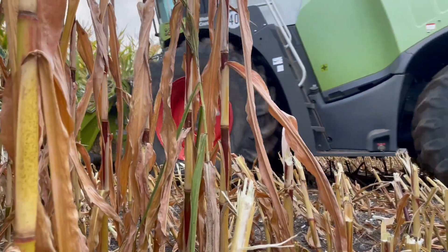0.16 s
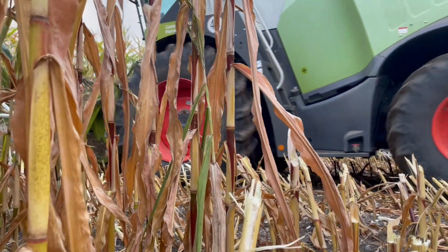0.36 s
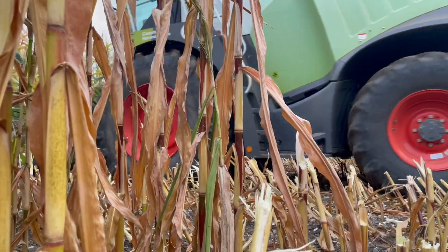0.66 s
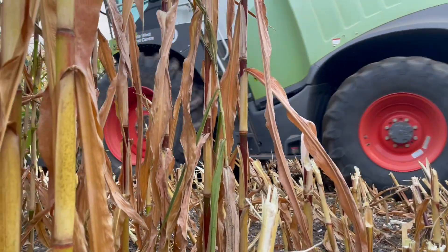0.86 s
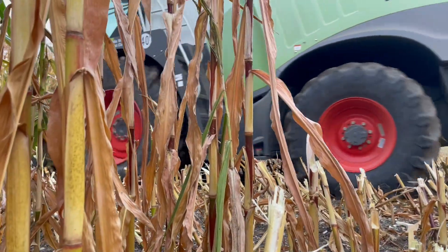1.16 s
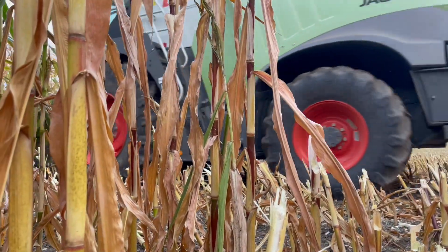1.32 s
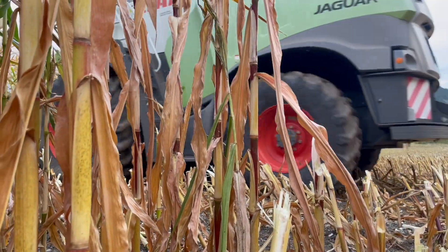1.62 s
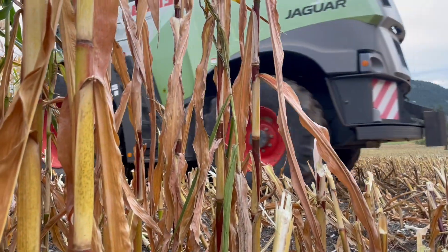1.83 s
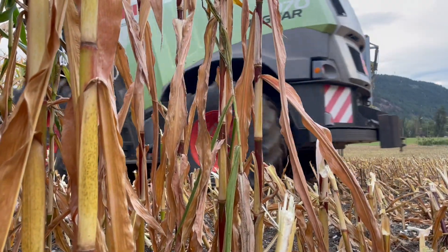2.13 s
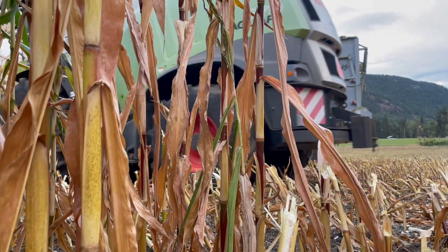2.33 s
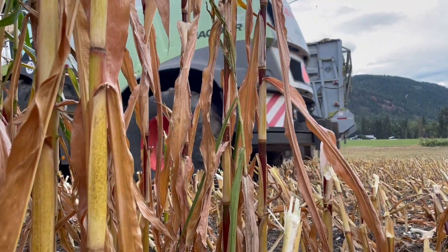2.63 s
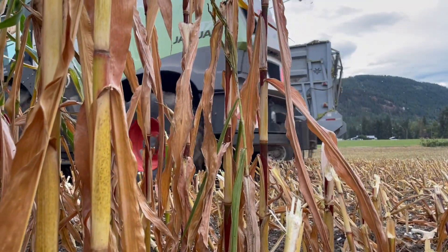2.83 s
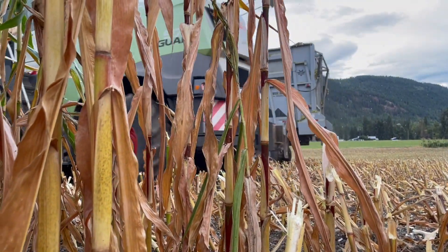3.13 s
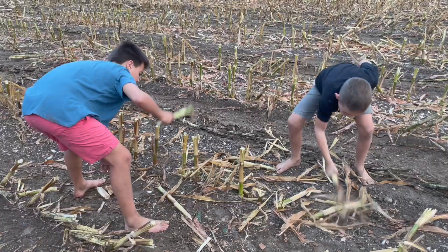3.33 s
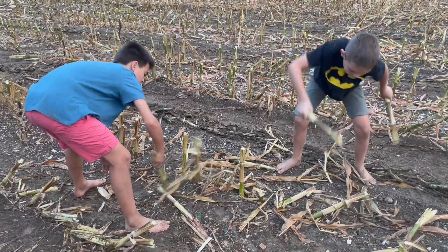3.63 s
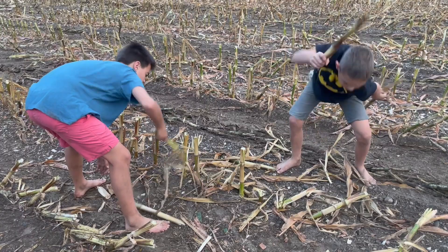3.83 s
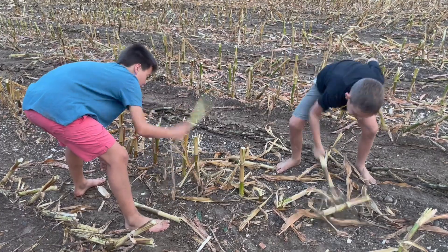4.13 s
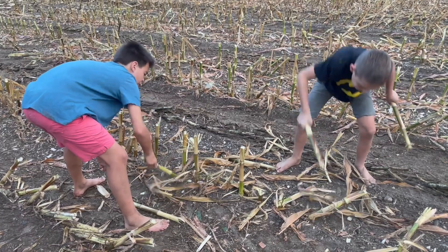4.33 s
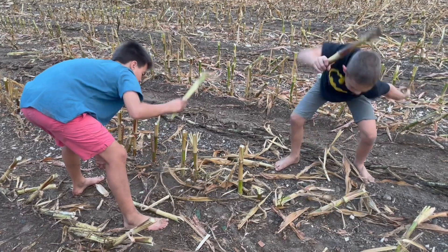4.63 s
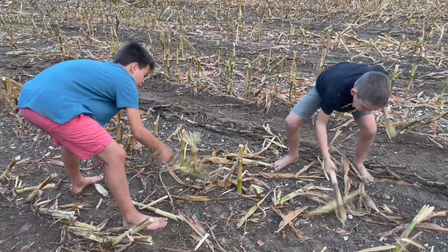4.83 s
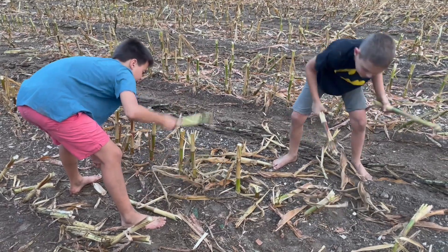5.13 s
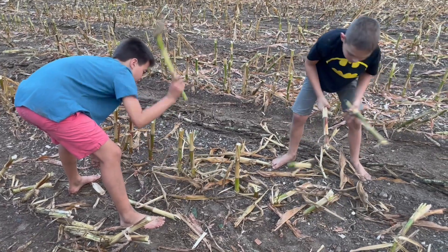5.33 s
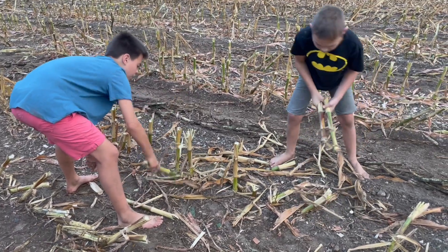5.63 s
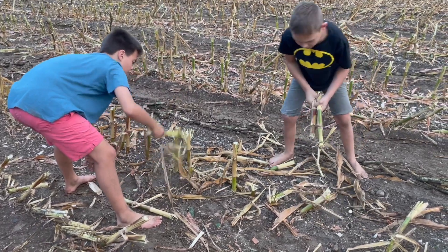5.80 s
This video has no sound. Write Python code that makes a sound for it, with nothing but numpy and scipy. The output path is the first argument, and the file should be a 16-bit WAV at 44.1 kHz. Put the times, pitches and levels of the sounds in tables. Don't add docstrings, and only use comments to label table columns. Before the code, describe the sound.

Close stereo handheld pickup, open air with no echo. First a dense, continuous machine roar with low booming panels and a tonal chopper drone, its hiss brightening near the end. A hard cut leads to near quiet: uneven sharp whacks of dry stalks on soil, strong full hits alternating with thinner lighter ones, splintering ticks, rustling leaves, low wind buffets, far engine hum and barely audible whistles.

```python
import sys
import numpy as np
from scipy import signal
from scipy.fft import rfft, irfft, next_fast_len
from scipy.io import wavfile

SR = 44100
rng = np.random.default_rng(int(sys.argv[2]) if len(sys.argv) > 2 else 0)


def boost_factor(decibels):
    exponent = np.asarray(decibels, float) / 20
    return 10 ** exponent


def generate_wav(sig):
    pcm = np.round(np.clip(np.atleast_2d(sig).T, -1, 1) * 32767).astype(np.int16)
    wavfile.write(sys.argv[1], SR, pcm)


N = 262836
T = np.arange(N) / SR
HARVEST_END_S, FIELD_START_S, FIELD_FADE_S = 3.2045, 3.24, .03
RUMBLE_DB = -15.5

# frequency in Hz, likeness from 0 to 1.
LIKENESS = [(60, 0.95), (150, 0.97), (300, 0.88), (640, 0.95), (1200, 0.65), (3000, 0.89), (6000, 0.61),
            (8500, 0.9), (11000, 0.87), (14000, 0.51)]
# frequency in Hz, density in dB per Hz.
FIELD_COLOUR = [(28, 7), (60, -1.5), (110, 8.5), (200, -23.5), (400, -11), (700, -18.5), (1200, -28),
                (2000, -26.5), (4000, -24.5), (7000, -28.5), (12000, -22.5), (16000, -32)]
# start in seconds, peak in dB, brightness in dB, hold in seconds, T60 in seconds.
SOIL_BLOWS = [(3.3301, -5, -3, 0.001, 0.023), (3.34, -19, 3, 0.009, 0.016), (3.361, -25, -6, 0.0043, .021),
              (3.367, -27, -1, 0.0094, 0.016), (4.0651, -8, -1.5, 0.004, 0.032),
              (4.087, -27, 8, 0.0014, 0.019), (4.1, -36, -4, 0.0098, .05), (4.794, -32.5, 1, 0.011, 0.037),
              (4.8148, -10, 4.5, 0.0017, 0.031), (4.824, -21.5, -15, 0.0052, 0.031),
              (4.851, -28, 2.5, 0.0018, 0.027), (5.4269, -12, -4.5, 0.0048, 0.022),
              (5.449, -34.5, 3, 0.0043, 0.034), (5.474, -41, 0, 0.032, 0.024), (5.512, -36, 5, .019, .032)]
# start in seconds, peak in dB, brightness in dB, hold in seconds, T60 in seconds.
STUBBLE_BLOWS = [(3.6057, -18, -4, 0.0062, 0.013), (3.6149, -14.5, 4, 0.0031, 0.019),
                 (3.624, -28.5, 3.5, 0.023, 0.067), (3.882, -32, -3, 0.0032, 0.068),
                 (4.1705, -14, -3.5, 0.003, 0.032), (4.182, -21, 1.5, .012, .027),
                 (4.203, -32, 6, 0.0074, 0.07)]


def rms_one(x):
    return x / np.sqrt(np.mean(x ** 2) + 1e-20)


def in_time(rows, t):
    s, *columns = np.transpose(rows)
    return [np.interp(t, s, c) for c in columns]


def at_hz(points, hz):
    f, v = np.transpose(points)
    return np.interp(np.log(hz + 1), np.log(f + 1), v)


def drift(rate, size):
    hop, settle = 40, 2000
    r = np.exp(-2 * hop * np.pi * rate / SR)
    white = rng.standard_normal(size // hop + settle + 2)
    slow = signal.lfilter([1], [1, -2 * r, r * r], white)[settle:]
    return np.interp(np.arange(size) / hop, np.arange(len(slow)), rms_one(slow))


def band(x, low_hz, high_hz):
    edges = [low_hz, min(high_hz, .45 * SR)]
    return signal.sosfilt(signal.butter(2, edges, "band", fs=SR, output="sos"), x)


def pair(mid, side, hz):
    alike = np.clip(at_hz(LIKENESS, hz), 0, 1)
    return np.sqrt((1 + alike) / 2) * mid + np.sqrt((1 - alike) / 2) * side * [[1], [-1]]


def layered_noise(colour, layers, white, patchy_db, fast_hz):
    size, out = white.shape[-1], 0
    edges = 26 * 2 ** np.arange(0, 9.5, 1 / 3)
    centres = np.sqrt(edges[1:] * edges[:-1])
    for low_hz, high_hz, level_db in layers:
        part, together = 0, drift(fast_hz / 4, size)
        for k in np.flatnonzero((centres >= low_hz) & (centres < high_hz)):
            mid, side = band(white[k % 2], edges[k], edges[k + 1])
            flicker_db = patchy_db * (1.15 * together + drift(fast_hz, size))
            gain = boost_factor(at_hz(colour, centres[k]) + flicker_db)
            part = part + gain * pair(mid, side, centres[k])
        out = out + boost_factor(level_db) * rms_one(part)
    return out


def wavering_tone(phase, hz, waver_db):
    size = len(phase)
    alike = np.clip(at_hz(LIKENESS, hz), 0, 1)
    apart = .5 * np.arccos(alike) * drift(11.5, size) * [[1], [-1]]
    strength = np.sqrt(2) * boost_factor(waver_db * drift(9.0, size))
    return strength * np.sin(phase + .5 * drift(6.0, size) + apart)


def passing(t):
    # time in seconds, loudness in dB, crop rush through the blower in dB.
    course = [(0, 1.5, 0.5), (.3, .5, -.5), (.6, 0.5, -.5), (1.2, 2, 1), (1.5, 0, 1), (1.8, -1, 0.5),
              (1.89, -1.5, 1), (2.2, 1, -0.5), (2.6, -2, 1), (3.2, 1.5, 1.5)]
    return in_time(course, t)


def chopping_roar(t):
    # frequency in Hz, density in dB per Hz.
    machine_colour = [(28, -23), (45, -8.5), (80, -1), (130, -3), (220, -5), (330, -13), (560, -11),
                      (900, -20.5), (1600, -24.5), (2800, -27), (5000, -34), (8000, -42.5), (12000, -41),
                      (16000, -61)]
    loud_db, rush_db = passing(t)
    roar_db = -23.5 + 0.2 * loud_db
    hiss_db = -30 + rush_db
    air_db = -40 + 1.5 * rush_db
    layers = [(0, 330, RUMBLE_DB + loud_db - 1.5), (330, 1700, roar_db + 1.45),
              (1700, 7300, hiss_db + 1.5), (7300, 18000, air_db + 6.0)]
    white = rng.standard_normal((2, 2, len(t)))
    return layered_noise(machine_colour, layers, white, patchy_db=0.74, fast_hz=20)


def booms(t):
    # frequency in Hz, width in Hz, level in dB against the rumble,
    # loudest time in seconds, lasting time in seconds.
    resonances = [(85, 19, -13, 1, 4.8), (131, 11.5, -9, 1.3, 8.6), (564.5, 32, -13, 2.6, 0.72),
                  (1622, 64, -20, 1.86, 0.39), (2597, 71, -21, 1.84, 0.24), (3494, 89, -24.5, 1.8, 1.3),
                  (6940, 2400, -16.5, 2.72, 0.12), (8000, 610, -13, 3.06, 0.3), (12700, 210, -29, .7, 0.88)]
    loud_db, _ = passing(t)
    rumble_db = (RUMBLE_DB + loud_db).mean()
    out = np.zeros((2, len(t)))
    for hz, width, level_db, loudest, lasting in resonances:
        mid, side = band(rng.standard_normal((2, len(t))), hz - width / 2, hz + width / 2)
        swell_db = -2.65 * ((t - loudest) / lasting) ** 2
        out += boost_factor(rumble_db + level_db + swell_db) * rms_one(pair(mid, side, hz))
    return out


def knife_drum(t):
    # time in seconds, second multiple of the knife rate in Hz, its level in dB.
    second_multiple = [(0, 395, -18.5), (.2, 397.3, -19.5), (.55, 395.6, -20.5), (.72, 393.9, -20.5),
                       (.96, 391.5, -29), (1.28, 395.8, -31.5), (1.55, 394.6, -25), (2.08, 394.8, -22),
                       (2.33, 397.7, -19.5), (2.62, 396, -23.5), (2.8, 389.3, -23.5), (3.2, 388, -31.5)]
    # multiple, level in dB.
    steady = [(1, -29), (3, -35), (7, -48), (8, -47), (10, -51)]
    # multiple, level in dB, fading from in seconds, slope in dB per second.
    sideways = [(4, -35, 0.66, -9), (5, -37, 1.1, -3), (6, -39, 0.88, -1)]
    double_hz, double_db = in_time(second_multiple, t)
    beams = [(multiple, db + slope * np.clip(t - start, 0, None))
             for multiple, db, start, slope in sideways]
    phase = np.pi * np.cumsum(double_hz) / SR
    out = np.zeros((2, len(t)))
    for multiple, level_db in [(2, double_db)] + beams + steady:
        waver_db = 1.3 if multiple == 2 else 4.0
        hz = multiple * double_hz.mean() / 2
        out += boost_factor(level_db) * wavering_tone(multiple * phase, hz, waver_db)
    return out


def wind_and_murmur(t):
    # time in seconds, wind level in dB.
    gusts = [(3.25, -38), (3.3, -45.5), (3.73, -51.5), (4.13, -40.5), (4.31, -43), (4.52, -47.5),
             (4.7, -45), (4.98, -31.5), (5.28, -39.5), (5.6, -43.5), (5.96, -40.5)]
    wind_db, = in_time(gusts, t)
    far_db = -56.5 + 0.31 * (wind_db + 44)
    white = rng.standard_normal((2, 2, len(t)))
    wind = layered_noise(FIELD_COLOUR, [(0, 165, wind_db + 1.5)], white, patchy_db=2.2, fast_hz=9)
    murmur = [(165, 2000, far_db + 2.5)]
    return wind + layered_noise(FIELD_COLOUR, murmur, white, patchy_db=2.0, fast_hz=16)


def far_engine(t):
    # time in seconds, firing note in Hz, its level in dB.
    firing = [(3.25, 49.2, -60), (3.78, 52.7, -48), (3.88, 53.5, -38.5), (4.6, 54.8, -40),
              (4.85, 57.1, -46), (5.1, 57.66, -34), (5.25, 56.5, -33), (5.36, 54.8, -60),
              (5.8, 56.7, -44.5), (5.96, 54, -42)]
    hz, low_db = in_time(firing, t)
    third_db = -48 - 2.9 * ((t - 3.66) / 0.48) ** 2
    phase = 2 * np.pi * np.cumsum(hz) / SR
    low = boost_factor(low_db) * wavering_tone(phase, 55, 2.2)
    return low + boost_factor(third_db) * wavering_tone(3 * phase, 160, 1.5)


def rustle(t):
    # start in seconds, length in seconds, rustle in dB, brightness in dB.
    stirs = [(3.272, 0.071, -54.5, -5), (3.392, .2, -64, 1.5), (3.624, 0.18, -58.5, 2),
             (3.858, 0.067, -53, 3), (4.042, 0.24, -51, 1), (4.277, 0.14, -57, 3.5),
             (4.417, 0.098, -52.5, 3.5), (4.815, 0.29, -53.5, 1), (5.11, 0.074, -67, 3),
             (5.28, 0.21, -59, 1), (5.452, 0.21, -59.5, 2), (5.662, .15, -54.5, 3), (5.802, 0.11, -55, -12)]
    still_db, still_bright_db, rise_s, settle_t60_s = -64, -2, 0.016, 0.055
    low, high = boost_factor(still_db) ** 2, boost_factor(still_db + still_bright_db) ** 2
    for s, length, level_db, bright_db in stirs:
        settling_db = -60 * np.clip(t - s - length, 0, None) / settle_t60_s
        stir = np.clip((t - s) / rise_s, 0, 1) * boost_factor(level_db + settling_db)
        low = low + stir ** 2
        high = high + (stir * boost_factor(bright_db)) ** 2
    return 10 * np.log10(low), 10 * np.log10(high)


def dry_leaves(t):
    leaf_db, thin_db = rustle(t)
    strength = boost_factor(3.85 * np.minimum(rng.exponential(1, len(t)), 5))
    ticks = 1 + 1.8 * strength * (rng.random(len(t)) < 900 / SR)
    white = rng.standard_normal((2, 2, len(t)))
    layers = [(1100, 7300, leaf_db), (7300, 18000, thin_db + 3.5)]
    return layered_noise(FIELD_COLOUR, layers, white * ticks, patchy_db=.7, fast_hz=30)


def thumps():
    # start in seconds, thump level in dB, settled pitch in Hz.
    blows = [
        (3.330, -6.5, 150),
        (3.367, -20.5, 171),
        (3.616, -19, 220),
        (4.066, -4, 173),
        (4.185, -23, 194),
        (4.211, -24.5, 194),
        (4.816, -6.5, 165),
        (5.427, -14, 170),
        (5.524, -30, 170),
    ]
    t60 = 0.052
    out = np.zeros(N)
    for s, level_db, last_hz in blows:
        first_hz = 473 + 7.5 * level_db
        t = np.clip(T - s, 0, None)
        turns = last_hz * t + (first_hz - last_hz) * 0.0048 * (1 - np.exp(-t / 0.0026))
        attack = 1 - np.exp(-t / 0.00061)
        out += boost_factor(level_db - 60 * (t / t60) ** 1.12) * attack * np.sin(2 * np.pi * turns)
        out += boost_factor(level_db - 17.5 - 40 * t / t60) * np.sin(2 * np.pi * 105 * t)
    return out * np.ones((2, 1))


def cracks():
    # start in seconds, peak in dB, brightness in dB.
    snaps = [(3.497, -45, -9), (3.5434, -52, -2), (3.6714, -44, -8), (3.79, -44, -3), (3.829, -50, 7),
             (3.853, -44, -1), (3.9254, -51, 7), (4.108, -38, -14), (4.122, -32, -10), (4.135, -31.5, -4),
             (4.234, -37, -12), (4.452, -51, 13), (4.484, -37.5, -8), (4.648, -48, -4), (4.694, -52, -5),
             (4.866, -36, 2), (4.9427, -44, -8), (4.9923, -38, -7), (5.0195, -47, -7), (5.065, -41, 3),
             (5.163, -50, 11), (5.214, -49, -3), (5.2823, -42.5, -2), (5.304, -51, 10), (5.471, -28, -20),
             (5.5713, -44, -19), (5.678, -48, -4), (5.7074, -49, -4)]
    snap_hold_s, snap_t60_s = 0.0014, 0.024
    fibres = rng.standard_normal((2, N)) * boost_factor(5.8 * np.minimum(rng.exponential(1, N), 4))
    ranges = [(220, 1050), (1050, 1700), (1700, 3000), (3000, 5600), (5600, 8000), (8000, 14500)]
    layers = []
    for k, (low_hz, high_hz) in enumerate(ranges):
        mid, side = band(fibres, low_hz, high_hz)
        layers.append((-1) ** k * rms_one(pair(mid, side, np.sqrt(low_hz * high_hz))))
    rows = [(0, *r) for r in SOIL_BLOWS] + [(-7.5, *r) for r in STUBBLE_BLOWS]
    rows += [(-31, *r, snap_hold_s, snap_t60_s) for r in snaps]
    out = np.zeros((2, N))
    for body_db, s, peak_db, bright_db, hold, t60 in rows:
        i = round(s * SR)
        t = T[:min(round(.2 * SR), N - i)]
        attack = 1 - np.exp(-t / (0.00014 + 0.022 * hold))
        snap = 1 + 1.08 * np.exp(-t / 0.00063 - hold / 0.011)
        decay_db = -60 * np.clip(t - hold, 0, None) / max(t60, .004)
        shape = attack * snap * boost_factor(peak_db - 9.5 + decay_db)
        gains_db = (body_db, -8.0, -2.8, -3.5, 1.4 * bright_db - 5.5, bright_db + 4.0)
        splinters = sum(boost_factor(g) * x[:, i:i + len(t)] for g, x in zip(gains_db, layers))
        out[:, i:i + len(t)] += shape * splinters
    return out


def stalk_ring():
    # frequency in Hz, level in dB against the crack, T60 in seconds.
    modes = [(653, -14, 0.023), (1270, -27, 0.013), (1930, -16, 0.06), (2624, -6.5, 0.017),
             (3540, -17, .02), (4710, -18, .025), (5150, -20, .025)]
    blows = SOIL_BLOWS + STUBBLE_BLOWS
    luck_db = 1.5 * rng.standard_normal((len(blows), len(modes)))
    t = T[:round(.06 * SR)]
    out = np.zeros(N)
    for (s, peak_db, *_), chances_db in zip(blows, luck_db):
        i = round(s * SR)
        for (hz, level_db, t60), chance_db in zip(modes, chances_db):
            decay = boost_factor(peak_db + level_db + chance_db - 60 * t / t60)
            out[i:i + len(t)] += decay * np.sin(2 * np.pi * hz * t)
    return out


def far_whistles(t):
    # start in seconds, end in seconds, pitch in Hz, level in dB.
    calls = [
        (3.782, 3.874, 1640, -61),
        (5.813, 5.96, 1814, -59),
        (5.82, 5.96, 2550, -66),
    ]
    out = np.zeros((2, len(t)))
    for start, end, hz, db in calls:
        swell = np.clip(np.minimum(t - start, end + .02 - t) / 0.018, 0, 1)
        phase = 2 * np.pi * hz * t + .4 * drift(30, len(t))
        out += swell * boost_factor(db) * wavering_tone(phase, hz, 1.5)
    return out


def scene():
    t = T[T < HARVEST_END_S]
    harvester = chopping_roar(t) + booms(t) + knife_drum(t)
    harvester = np.pad(harvester, ((0, 0), (0, N - len(t))))
    t = T[T >= FIELD_START_S]
    field = wind_and_murmur(t) + far_engine(t) + dry_leaves(t) + far_whistles(t)
    field = field * np.clip((t - FIELD_START_S) / FIELD_FADE_S, 0, 1)
    field = np.pad(field, ((0, 0), (N - len(t), 0)))
    return harvester + field + thumps() + cracks() + stalk_ring()


def top_cut(x):
    return signal.sosfilt(signal.butter(12, 16480, fs=SR, output="sos"), x)


def record(dry):
    # frequency in Hz, left over right in dB.
    port_db = [(60, 3), (110, -3), (200, -2.5), (380, -2.5), (700, -1), (1290, 2.0), (2380, 1.5), (4400, 3),
               (8120, 0), (15000, 0)]
    # frequency in Hz, phase in radians by which left leads.
    port_phase = [(0, 0), (900, .55), (1750, -.45), (3000, .9), (4500, .6), (5200, .9), (5800, -1.7),
                  (6500, -1.1), (8600, -3.14), (13300, -6.28), (20000, -6.28)]
    # frequency in Hz, gain in dB.
    sum_gain = [(30, -9.5), (42, 1), (7300, -1), (7900, -2), (8600, -6), (9200, 1), (9900, 2),
                (13000, -1), (14500, -6.5), (15700, 3), (15900, -47)]
    # frequency in Hz, gain in dB.
    difference_gain = [(30, -6.5), (300, -5.5), (600, 3.5), (12400, 0), (13300, -4), (16000, -46)]
    size = next_fast_len(N + 4096)
    hz = np.arange(size // 2 + 1) * SR / size
    half_phase = .5 * np.interp(hz, *np.transpose(port_phase))
    half = boost_factor(at_hz(port_db, hz) / 2) * np.exp(1j * half_phase)
    rounded = .9 * np.tanh(dry / .9)
    left, right = rfft(rounded, size) * np.array([half, 1 / half])
    mid = (left + right) / 2 * boost_factor(at_hz(sum_gain, hz))
    side = (left - right) / 2 * boost_factor(at_hz(difference_gain, hz))
    mix = irfft([mid + side, mid - side], size)[:, :N]
    return top_cut(mix)


dry = scene()
out = record(dry)
generate_wav(out)
```